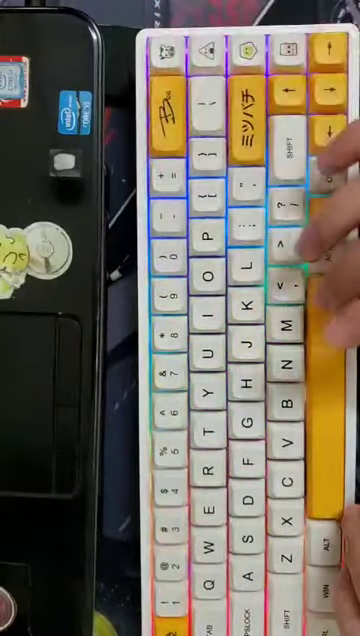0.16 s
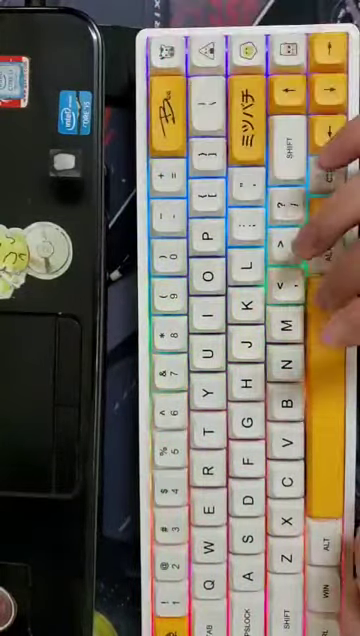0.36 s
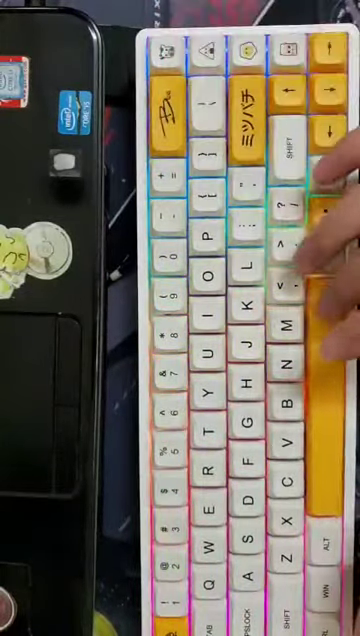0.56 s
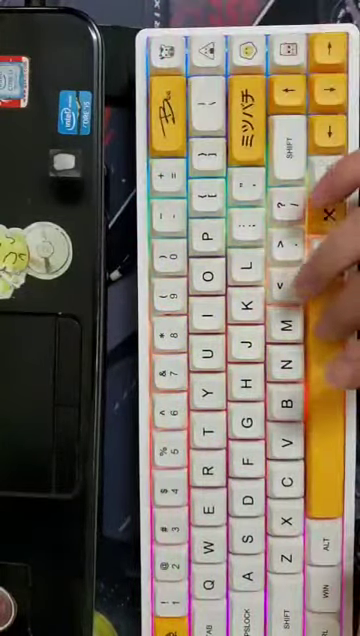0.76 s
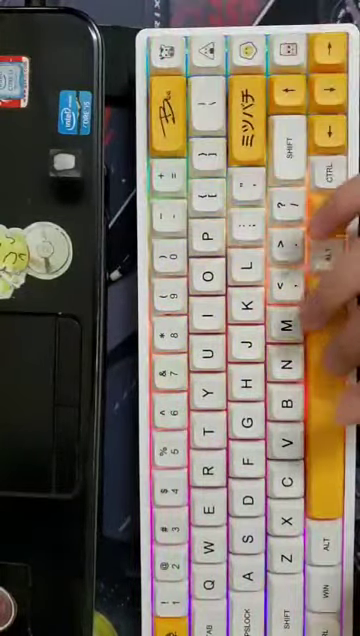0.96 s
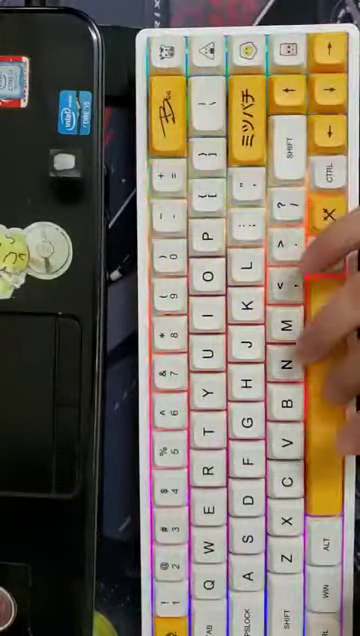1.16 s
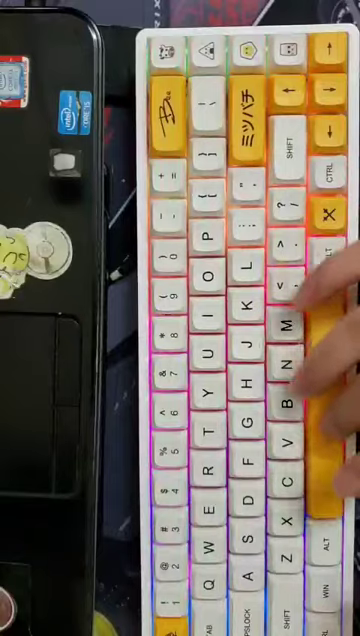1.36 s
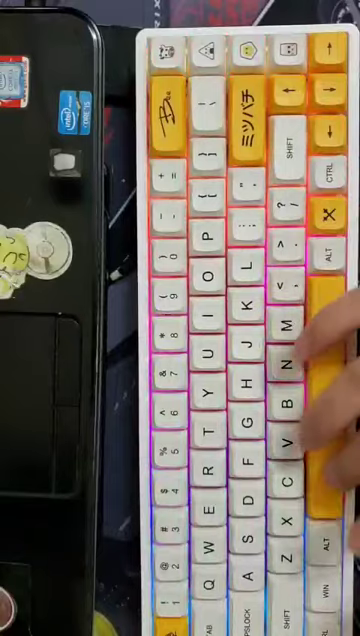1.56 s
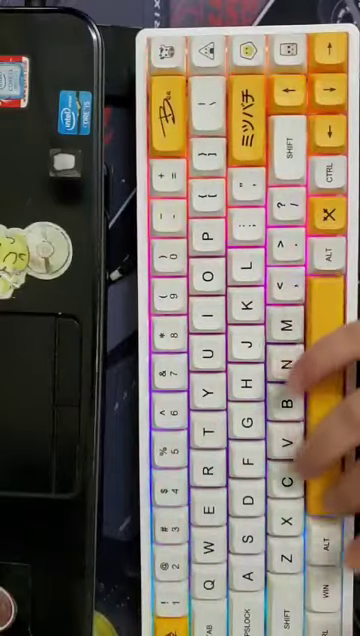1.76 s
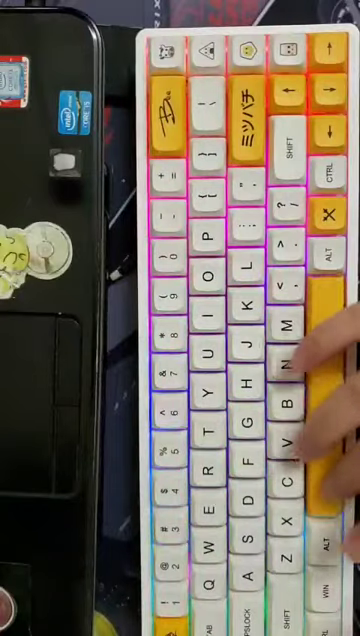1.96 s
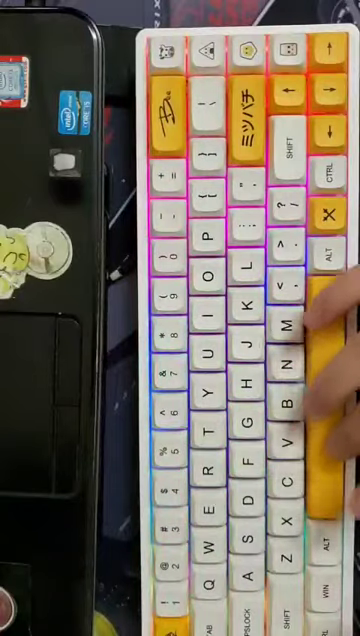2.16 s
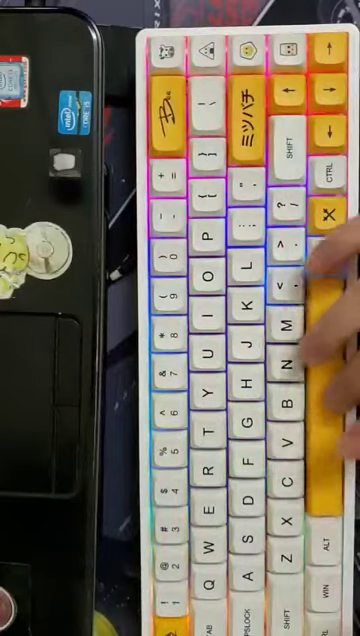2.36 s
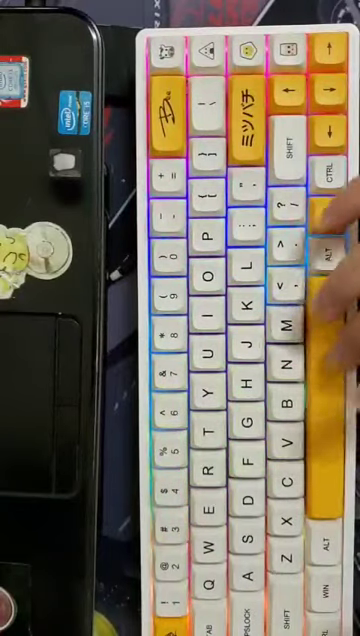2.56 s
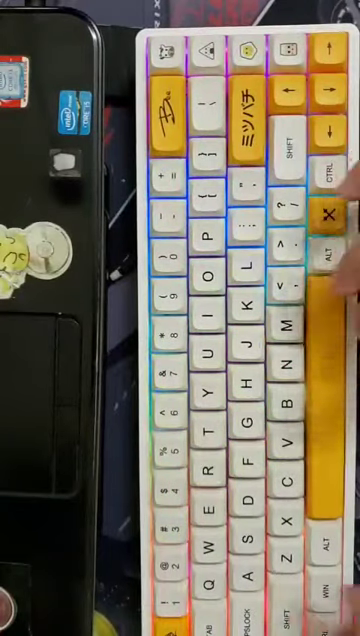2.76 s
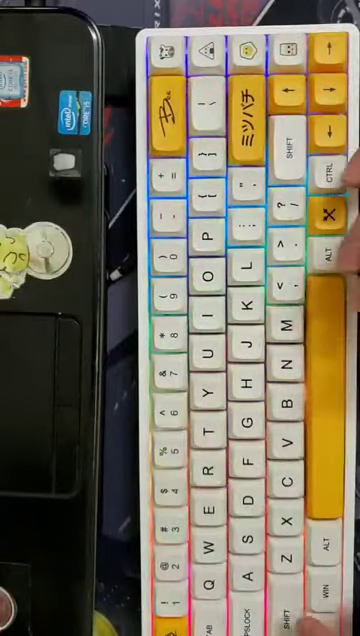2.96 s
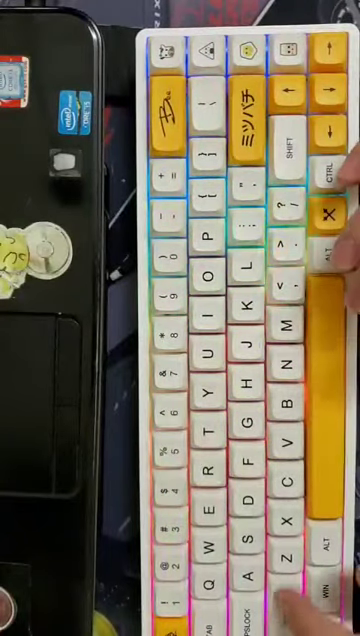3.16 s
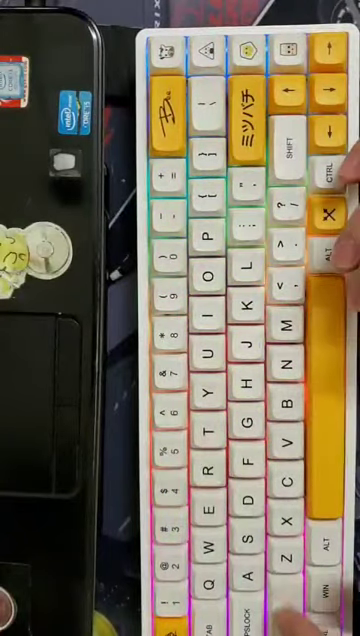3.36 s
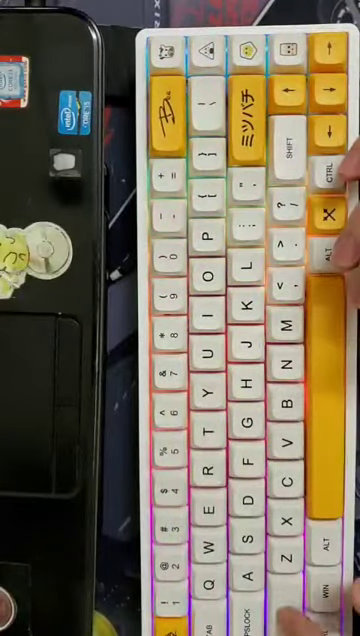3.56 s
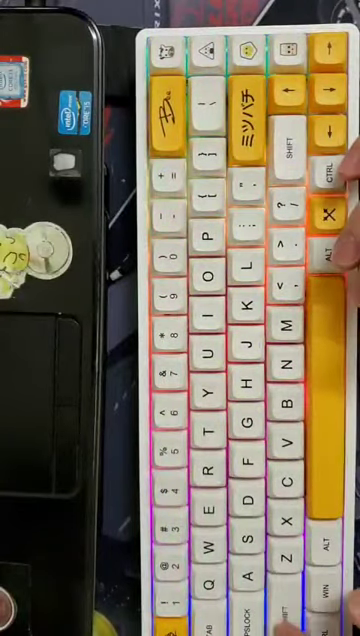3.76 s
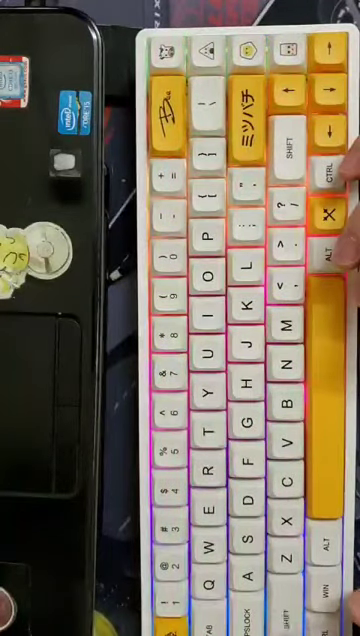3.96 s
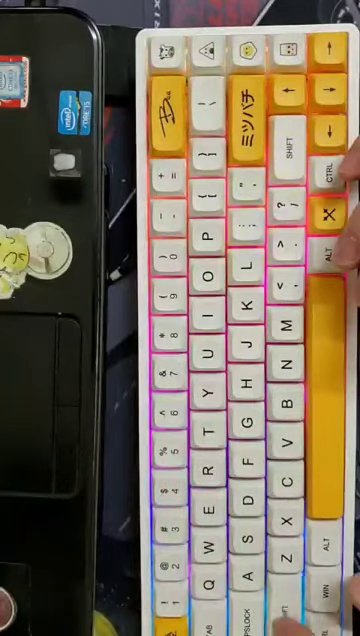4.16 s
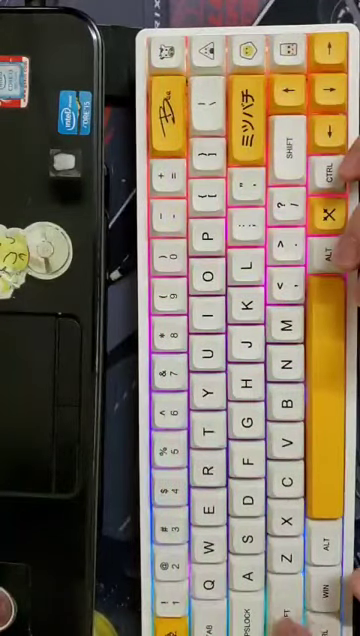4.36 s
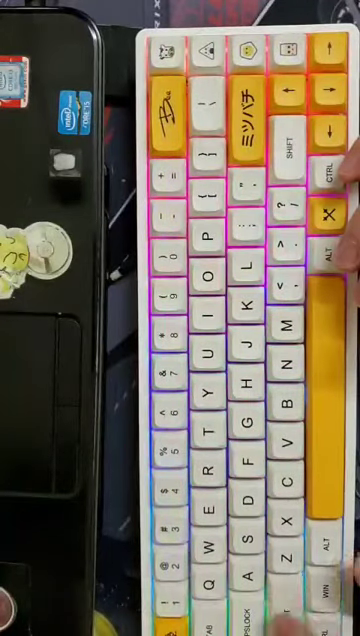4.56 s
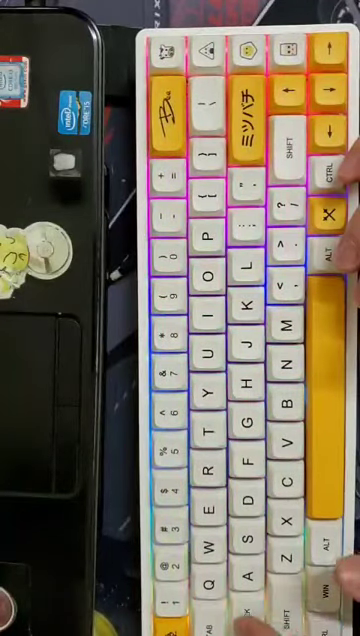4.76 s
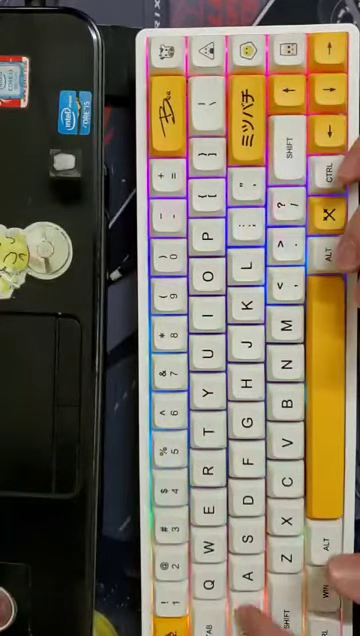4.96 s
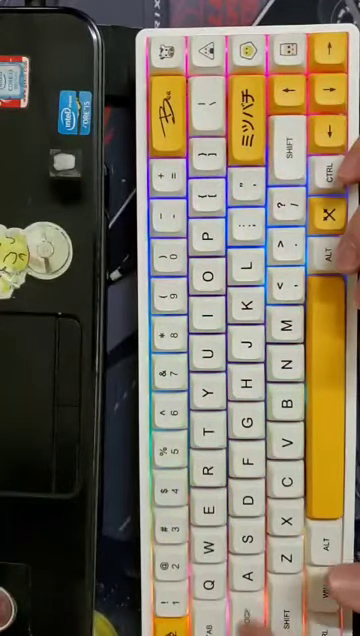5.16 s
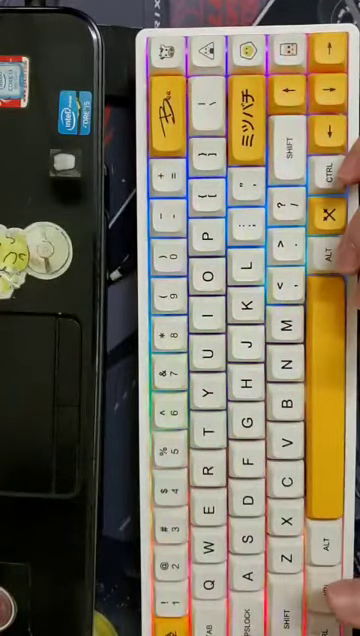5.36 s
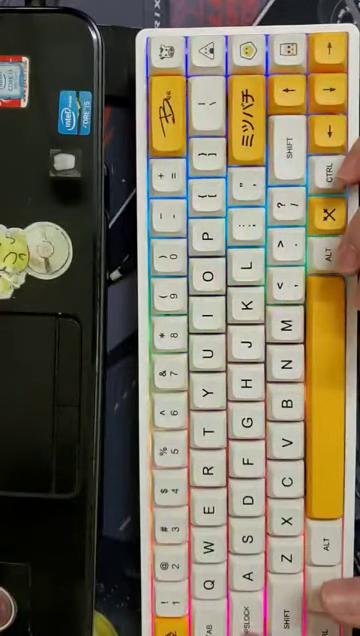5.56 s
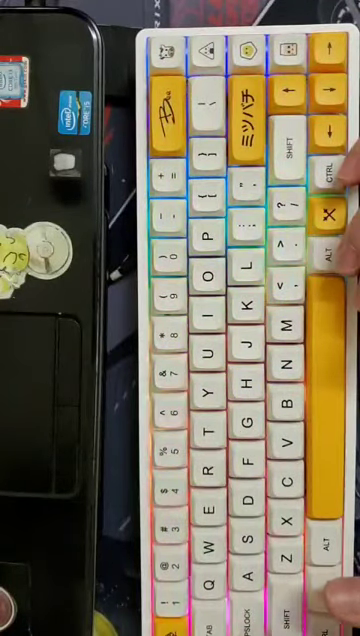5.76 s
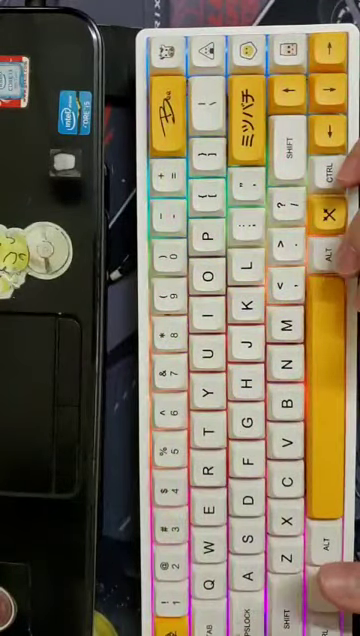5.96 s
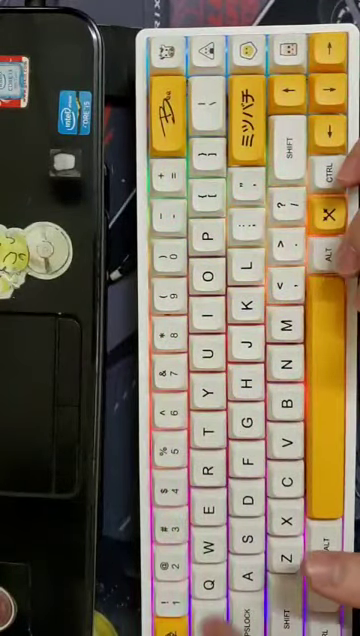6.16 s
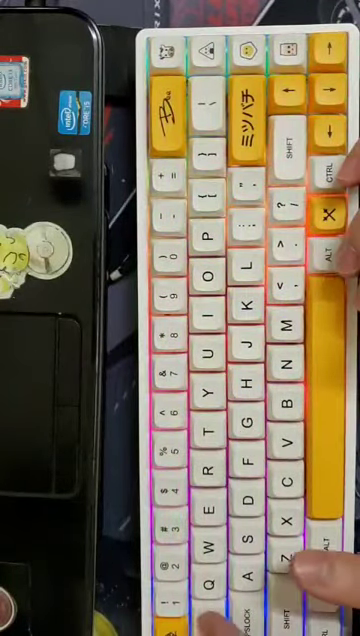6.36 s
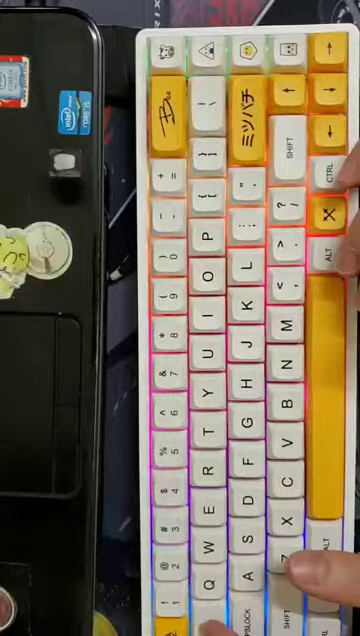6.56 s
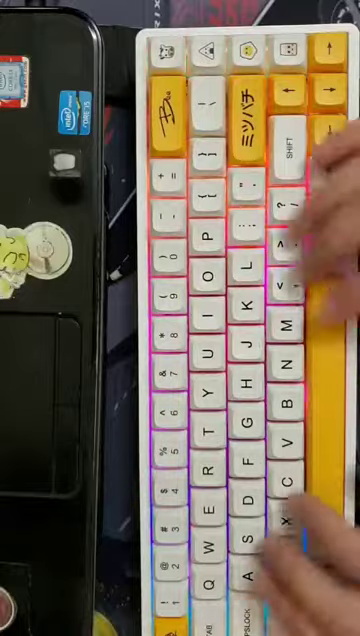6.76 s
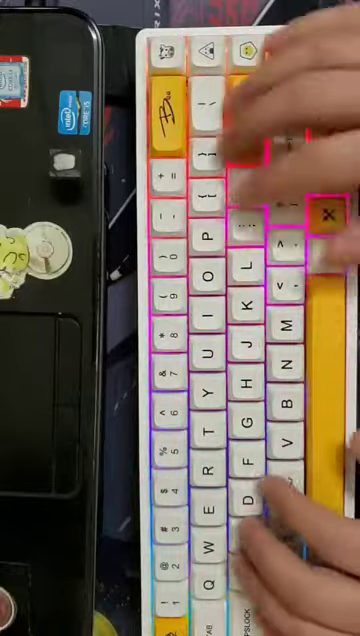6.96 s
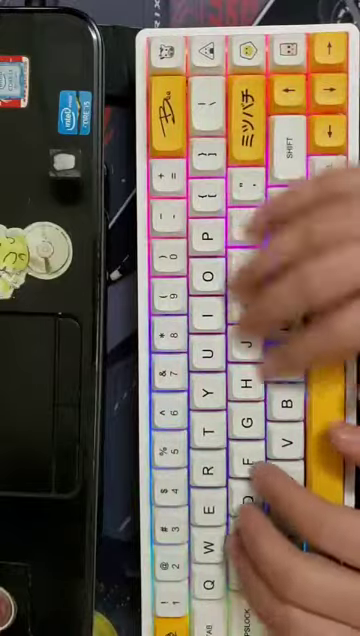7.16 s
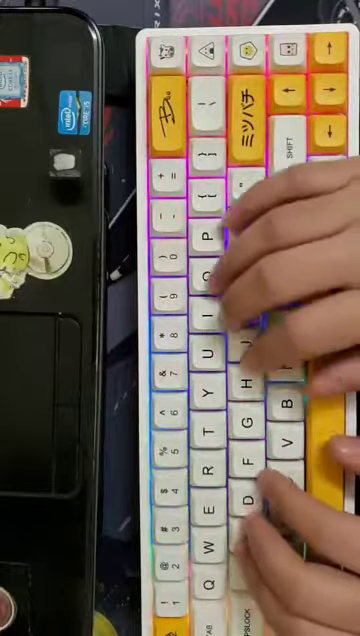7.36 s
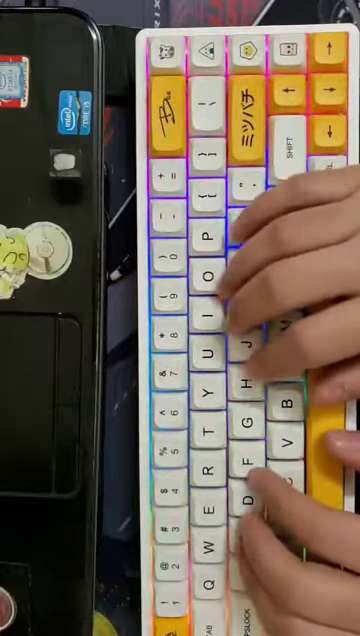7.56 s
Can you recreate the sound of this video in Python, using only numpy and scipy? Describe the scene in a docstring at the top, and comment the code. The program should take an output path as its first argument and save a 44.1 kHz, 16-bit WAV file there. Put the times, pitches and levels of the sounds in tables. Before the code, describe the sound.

Close stereo microphone over a mechanical keyboard in a small quiet room. The space bar is tapped sixteen times at an even pace, deep and hollow with a soft desk thump. Then three wide keys at the left end follow in turn, brighter and drier, each press paired with a lighter release tick. A short rattle follows the last tap, then hands brush the keys softly.

```python
"""In a small room, four wide keys of a mechanical keyboard are tapped in turn close to a stereo microphone:
space bar, shift, caps lock, tab. Damped resonances form the keycap and case; coloured impulses, noise bursts
and decaying sines form the switch tick, spring buzz and desk thump; diffuse echoes answer them.
Shaped noise gives a brief keycap rattle, soft bumps and brushes of the hands, and the quiet room noise."""
import sys
import numpy as np
from scipy import signal
from scipy.fft import rfft, irfft
from scipy.io import wavfile
from scipy.ndimage import uniform_filter1d

SR = 44100
rng = np.random.default_rng(int(sys.argv[2]) if len(sys.argv) > 2 else 0)


def to_wav(sig):
    """Store sig (one row per channel, or 1-D mono) as 16-bit WAV at the path in sys.argv[1].

    Samples outside -1..1 are clipped; the rate is SR.
    """
    pcm = np.clip(np.atleast_2d(sig), -1, 1) * 32767
    pcm = np.round(pcm).astype(np.int16)
    wavfile.write(sys.argv[1], SR, pcm.T)  # frames by channels


N = 335160

# Taps on each key: [press t/s, press level/dB, hold t/s, release level/dB]
SPACE_TAPS = [(0.4427, -28.5, 0.074, -34.5), (0.5957, -24, .074, -33), (0.7633, -24, .0746, -39),
              (0.9097, -25.5, 0.069, -32.5), (1.0718, -24.5, 0.069, -36), (1.2188, -24, 0.064, -35),
              (1.3674, -22, 0.064, -37), (1.5109, -22, .0631, -33.5), (1.6679, -21, .0611, -31),
              (1.816, -20, 0.072, -33.5), (1.9768, -21.5, .0648, -37), (2.1137, -21.5, .0702, -38.5),
              (2.2615, -22, 0.062, -39.5), (2.4021, -24.5, 0.056, -37), (2.5482, -26.5, 0.045, -34.5),
              (2.7057, -34, 0.046, -38.5)]
CAPS_TAPS = [(4.8718, -26.5, .077, -31.5), (5.0419, -30, 0.068, -31.5), (5.1884, -22.5, .0691, -30),
             (5.3436, -26, 0.067, -33.5), (5.4877, -30, .0549, -34), (5.6188, -27.5, .0625, -32.5),
             (5.754, -25.5, 0.061, -29.5), (5.9086, -26, .0826, -33)]
TAB_TAPS = [(6.2756, -35, .074, -32), (6.4383, -34, 0.059, -35), (6.5774, -27, .0806, -35)]
# Taps on shift, whose tick a cushioning finger softens:
# [press t/s, press level/dB, hold t/s, release level/dB, press cushion/dB, release cushion/dB]
SHIFT_TAPS = [(3.1601, -33.5, .0672, -34.5, 6, 2.5), (3.3247, -27.5, 0.069, -35, 1.5, 6),
              (3.4869, -27.5, 0.068, -25, 2.5, 16.5), (3.6385, -25, 0.062, -26.5, 33, 21),
              (3.7861, -27, 0.054, -28, 7, 5), (3.9235, -27, 0.062, -32.5, 7.5, 4),
              (4.0532, -29.5, .0703, -36, 21, 20), (4.2029, -28.5, .0598, -30.5, 11.5, 30),
              (4.3554, -33.5, 0.052, -25, 22, 12.5), (4.4973, -26.5, .0773, -38.5, 5, 15)]
# Keycap resonances: [f/Hz, bandwidth/Hz, relative level/dB]
SPACE_CAP = [(1292, 53, -11), (1640, 110, -3.5), (1753, 170, 3.5), (2240, 490, -9.5), (2574, 125, -4.5),
             (3323, 190, -5), (3910, 180, -7.5)]
SHIFT_CAP = [(1271, 84, 13.5), (1624, 240, 14.5), (1857, 190, 11.5), (2060, 150, 8.5), (2490, 130, -22.5)]
CAPS_CAP = [(1250, 100, 1), (1770, 530, 9.5), (2130, 370, -3), (2545, 110, 5), (3400, 440, -7)]
TAB_CAP = [(1730, 2100, 4), (2260, 390, -9), (2440, 300, 2.5), (3080, 560, -1.5)]
# Case resonances under the middle and at the left end: [f/Hz, bandwidth/Hz, relative level/dB]
CASE_MIDDLE = [(463.4, 103, 1), (501, 88, 3), (565, 33, 1.5), (844, 54, -6.5), (1046, 93, -3.5)]
CASE_END = [(214, 230, 2.5), (441, 48, 6), (896, 163, 11.5), (1057, 24, -7.5)]
# Spectral envelopes of the switch ticks: [f/Hz, relative level/dB]
DULL_TICK = [(1700, -13), (4200, -2.5), (7500, -10.5), (10000, -17.5), (14000, -16.5), (16500, -37.5)]
SHARP_TICK = [(1200, -2.5), (3000, 2.5), (6000, -8), (8000, -6.5), (11000, -11.5), (13000, -14),
              (16500, -15.5)]
SHIFT_TICK = [(1200, -0.5), (3000, 5), (6000, 0), (9000, -5.5), (11500, -5), (13500, -24.5), (16500, -22)]
# Switch spring resonances: [f/Hz, bandwidth/Hz, relative level/dB]
SPACE_SPRING = [(5120, 560, 3.5), (7160, 320, -7)]
SHIFT_SPRING = [(5600, 1200, 0)]
CAPS_SPRING = [(5210, 270, -8.5), (7500, 78, -2.5), (11000, 1900, -24)]
TAB_SPRING = [(6130, 840, 1)]
# Blow levels at normal strength, one row for a press and one for a release:
# [case level/dB, switch tick level/dB, desk level/dB]
SPACE_LEVELS = [(-28.5, -48.5, -30.5), (-28, -52.5, -31.5)]
SHIFT_LEVELS = [(-40, -32.5, -37.5), (-38, -38.5, -43.5)]
CAPS_LEVELS = [(-38.3, -36, -42.5), (-37.4, -42.5, -49)]
TAB_LEVELS = [(-41, -29.5, -38.5), (-38.5, -36, -44)]
# Slow change of the desk thump, added to its level: [t/s, level/dB]
THUMP_LEVEL = [(.45, 1.5), (1.1, 2.5), (1.45, -2.5), (2.2, -2), (2.7, 1), (3.3, -2), (4.1, -4.5),
               (4.9, 0.5), (5.75, -0.5), (5.9, 6), (6.3, 0.5)]
# Desk modes: [f/Hz, t60/s, relative level on a press/dB, relative level on a release/dB]
DESK_MODES = [(63.1, 0.64, -21, -52), (88, 0.12, -1.5, -8.5), (109.1, 0.12, 2, -8), (138.7, 0.3, -6, -3),
              (278.3, 0.12, -14, -11.5)]
# Reverberation time of the room: [f/Hz, t60/s]
ROOM_T60 = [(150, 0.22), (2000, 0.26), (6000, 0.47), (14000, 0.36)]
# Spectral envelope of the room's echoes: [f/Hz, level/dB]
ROOM_COLOUR = [(100, 8), (300, 6.5), (600, -1), (950, 0.5), (1800, -3), (3000, -1.5), (5500, -4),
               (9000, -3.5), (14000, 1.5)]
# Spectral envelope of the room noise: [f/Hz, relative level/dB]
AIR_COLOUR = [(30, -48), (55, 3.5), (80, -14.5), (115, -6.5), (190, -25), (265, -13.5), (380, -21),
              (600, -14.5), (930, -27.5), (1500, -22), (2600, -35.5), (5000, -45.5), (10500, -53),
              (15000, -43)]
# Soft bumps and brushes of the hands: [t/s, rise/s, t60/s, level/dB]
BUMPS = [(3.765, 0.014, 0.19, -49.5), (6.779, 0.0056, 0.083, -44.5), (6.815, 0.0092, 0.11, -49)]
BRUSHES = [(0.02, 0.045, 0.37, -60.5), (7.16, 0.05, 0.1, -55), (7.2, 0.019, 0.27, -48.5),
           (7.221, .005, 0.078, -72)]
# Spectral envelopes of bump and brush: [f/Hz, relative level/dB]
BUMP_COLOUR = [(150, -40), (270, -3), (340, -12.5), (500, -24), (4000, -53)]
BRUSH_COLOUR = [(200, -11), (500, 1), (1400, 5.5), (2500, -4), (5000, -20), (9000, -18), (14500, -11.5),
                (16000, -17)]
# Rattle of a keycap shaken loose by a hard press: [t/s, rise/s, t60/s, level/dB]
RATTLES = [(6.583, 0.0021, 0.16, -35)]
# Spectral envelope of the rattle: [f/Hz, relative level/dB]
RATTLE_COLOUR = [(1300, -26.5), (2950, 5.5), (7500, -47)]

# Samples in one stroke's sound, in its lead-in and in 10 ms
SIZE, LEAD, FRAME = 16384, 256, 441
HZ = np.fft.rfftfreq(SIZE, 1 / SR)
T = np.arange(SIZE) / SR
LOW_HZ, TOP_HZ = 47, 16300  # edges of the microphone's band
NORMAL_DB = -30  # strength of a normal stroke
# Growth in dB per dB of strength; the keycap grows by 1
CASE_GROWTH, TICK_GROWTH, DESK_GROWTH = 0.58, 1.375, 0.5
TOUCH_CASE_DB = -55.5  # a fingertip landing on a key faintly knocks the case
SLIDE_T60_S = 0.06
LATE_DB, LATE_T60_S = -15.5, 0.47  # the room's faint late tail
LATE_BAND_HZ = 1200, 2300  # the range in which it lingers


def amp(db):
    """Decibel law: an amplitude ratio of ten for every 20 dB."""
    return 10 ** (np.asarray(db) / 20)


def along(points, hz):
    """Linear interpolation of tabulated values over logarithmic frequency."""
    f, v = np.transpose(points)
    return np.interp(np.log(hz + 1), np.log(f), v)


def noise(colour, alike):
    """Partial coherence: two coloured noises mixed to channels of rms near 1 and correlation `alike`."""
    gain = amp(along(colour, np.fft.rfftfreq(N, 1 / SR)))
    common, opposed = irfft(rfft(rng.standard_normal((2, N))) * gain, N)
    turn = np.arccos(alike) / 2
    stereo = np.cos(turn) * common + np.sin(turn) * np.array([opposed, -opposed])
    return stereo / common.std()


def air():
    """Stationary background: quiet room noise, nearly alike on both sides."""
    return amp(-57.0) * noise(AIR_COLOUR, alike=0.85)


def touches(rows, colour, alike):
    """Contact noise: each touch swells as a Gaussian and decays exponentially."""
    t = np.arange(N) / SR
    level = np.zeros(N)
    for s, rise, t60, db in rows:
        swell = np.exp(-(np.minimum(t - s, 0) / rise) ** 2)
        decay = amp(db - 60 * np.maximum(t - s, 0) / t60)
        level += decay * swell
    return level * noise(colour, alike)


def hands():
    """Stick-slip friction: fingers catch and slip over the keycaps; a palm bumps the desk."""
    grain = uniform_filter1d(rng.standard_normal(N), size=160)
    catches = amp(3 * grain / grain.std())
    bumps = touches(BUMPS, BUMP_COLOUR, alike=0.87)
    return bumps + catches * touches(BRUSHES, BRUSH_COLOUR, alike=0.14)


def rattle():
    """Loose contact: a brief noise burst from the keycap after the hardest tab press."""
    return touches(RATTLES, RATTLE_COLOUR, alike=0.3)


def delay(ms):
    """Shift theorem: a delay is a phase proportional to frequency."""
    return np.exp(-2j * np.pi * HZ * ms / 1000)


def band(low_hz, high_hz):
    """Limited radiation: a small part radiates little outside its range (causal band-pass)."""
    b, a = signal.butter(2, [low_hz, high_hz], "bandpass", fs=SR)
    return signal.freqz(b, a, HZ, fs=SR)[1]


def chatter(t60):
    """Random impacts: many tiny contacts dying away, scaled to unit energy on the left."""
    burst = rng.standard_normal((2, SIZE)) * amp(-60 * T / t60)
    return rfft(burst) / np.linalg.norm(burst[0])


def walls(first_s, t60):
    """Early reflection: a cluster of echoes from the nearest walls."""
    return chatter(t60) * delay(1000 * first_s)


def room(early, tail_db, first_s, mono_hz, bass_spread):
    """Reverberation: early echoes, a short diffuse tail and a faint late one; the bass is nearly alike."""
    hz, t, z = signal.stft(rng.standard_normal((2, SIZE)), SR, nperseg=256)
    decay = amp(-60 * t / along(ROOM_T60, hz)[:, None])
    tail = signal.istft(z * decay, SR, nperseg=256)[1][:, :SIZE]
    tail = tail * (T > first_s)
    diffuse = amp(tail_db) * rfft(tail) / np.linalg.norm(tail[0])
    late = amp(LATE_DB) * chatter(LATE_T60_S) * band(*LATE_BAND_HZ)
    mid, side = early + diffuse + late
    # the side part shrinks to bass_spread below mono_hz
    spread = np.hypot(HZ, bass_spread * mono_hz) / np.hypot(HZ, mono_hz)
    stereo = (mid + spread * np.array([side, -side])) / np.sqrt(1 + spread ** 2)
    return amp(along(ROOM_COLOUR, HZ)) * stereo


def near_echo(gain, ms, dull_hz):
    """Single reflection: a hard surface close by returns the sound once, duller above dull_hz."""
    return 1 + gain * delay(ms) / (1 + 1j * HZ / dull_hz)


def place(lag_ms, pan_db, apart_hz=1550):
    """Stereo difference: positive pan favours the left, positive lag lets it lead; long waves stay in step."""
    lag = lag_ms * HZ ** 4 / (HZ ** 4 + apart_hz ** 4)
    left = amp(pan_db / 2) * delay(-lag / 2)
    right = amp(-pan_db / 2) * delay(lag / 2)
    return np.array([left, right])


def blow(spectrum):
    """Energy normalization: a short sound is given the energy of 10 ms at rms 1."""
    energy = np.mean(np.sum(irfft(spectrum) ** 2, -1))
    return spectrum / np.sqrt(energy / FRAME)


def desk(released, tilt_db, rise_s, late_ms, scatter_db):
    """Modal vibration: the desk top swings up slowly and booms on; tilt in dB per octave acts below 150 Hz."""
    hz, t60, down, up = np.transpose(DESK_MODES)[:, :, None]
    tilt = tilt_db * np.minimum(np.log2(hz / 150), 0)
    db = (up if released else down) + tilt + scatter_db * rng.standard_normal(hz.shape)
    boom = np.sum(amp(db - 60 * T / t60) * np.sin(2 * np.pi * hz * T), 0)
    swing_up = 1 - np.exp(-T / rise_s)
    return blow(rfft(boom * swing_up)) * delay(late_ms)


def causal(db):
    """Minimum phase: the folded cepstrum gives the shortest causal response with this gain curve."""
    cepstrum = irfft(np.log(amp(db)))
    cepstrum[1:SIZE // 2] *= 2
    cepstrum[SIZE // 2 + 1:] = 0
    return np.exp(rfft(cepstrum))


def tick(colour, top_hz, rattle_db, rattle_t60):
    """Impact: the stem hits its stop and chatters for milliseconds; a softer stop has a lower top."""
    top_loss_db = 10 * np.log10(1 + (HZ / top_hz) ** 20)
    contact = causal(along(colour, HZ) - top_loss_db)
    return contact * (1 + amp(rattle_db) * chatter(rattle_t60))


def ring(modes, scatter_db, detune, apart_db):
    """Damped resonance: modes vary in pitch and level as the finger lands a little differently each time."""
    hz, width, db = np.transpose(modes)[:, :, None]
    hz = hz * (1 + detune * rng.standard_normal(hz.shape))
    db = db + scatter_db * rng.standard_normal(hz.shape)
    gain = amp(db + apart_db * rng.standard_normal((2,) + hz.shape))  # separate on each side
    resonance = 1j * HZ * width / (hz ** 2 - HZ ** 2 + 1j * HZ * width)
    return np.sum(gain * resonance, 1)


def add(track, s, spectrum):
    """Superposition: a short sound, with its lead-in, is summed into the track at time s."""
    sound = np.roll(irfft(spectrum), LEAD)
    start = round(s * SR) - LEAD
    track[:, start:start + SIZE] += sound[:, :N - start]


def strokes(taps, levels):
    """Excitation: one strength per press or release sets how hard keycap, case, switch and desk sound."""
    growth = np.array([CASE_GROWTH, TICK_GROWTH, DESK_GROWTH])
    for s, press_db, hold_s, release_db, *cushions in taps:
        pair = zip((s, s + hold_s), (press_db, release_db), cushions or (0, 0))
        for released, (at, db, cushion_db) in enumerate(pair):
            case_db, tick_db, desk_db = levels[released] + (db - NORMAL_DB) * growth
            desk_db = desk_db + np.interp(at, *np.transpose(THUMP_LEVEL))
            yield at, released, db, case_db, tick_db - cushion_db, desk_db


def key(blows, cap_modes, case_modes, colour, springs, lag_ms, pan_db, tick_pan_db, top_hz,
        desk_tilt_db, case_ms, case_low_hz, echo, press_rattle_db, release_rattle_db,
        press_spring_db, release_spring_db, spring_t60, touch_db, wet_db, tick_wet_db):
    """Impulsive excitation of coupled parts: one key bottoms out and snaps back, again and again."""
    track = np.zeros((2, N))
    bounce = near_echo(gain=echo, ms=2.332, dull_hz=3930)
    cap_path = band(low_hz=1117, high_hz=2970) * bounce * place(lag_ms, pan_db)
    case_path = band(low_hz=case_low_hz, high_hz=1450) * bounce * delay(case_ms)
    steady_echoes = walls(first_s=0.008, t60=0.041)
    for s, released, cap_db, case_db, tick_db, desk_db in blows:
        rattle_db = release_rattle_db if released else press_rattle_db
        spring_db = release_spring_db if released else press_spring_db

        # the cap wobbles on its stem, so every blow is a little rough
        wobble = 1 + amp(-7.5) * chatter(t60=0.024)
        cap = ring(cap_modes, scatter_db=1.5, detune=0.019, apart_db=-1)
        cap = amp(cap_db) * blow(cap * cap_path * wobble)
        case = ring(case_modes, scatter_db=3.0, detune=0.01, apart_db=2.5)
        case = amp(case_db) * blow(case * case_path)
        clack = cap + case

        click = tick(colour, top_hz, rattle_db, rattle_t60=0.0089)
        click = amp(tick_db) * blow(click * place(lag_ms, tick_pan_db)) * delay(0.23)

        # the loose spring goes on buzzing after the blow
        buzz = ring(springs, scatter_db=-3.5, detune=0.0025, apart_db=-1.0)
        buzz = amp(tick_db + spring_db) * blow(buzz * chatter(spring_t60))

        if not released:
            # the fingertip meets the cap and the stem slides just before the key bottoms out
            slide = ring(cap_modes, scatter_db=5, detune=0.065, apart_db=9.5)
            slide = blow(slide * cap_path * chatter(SLIDE_T60_S))
            nudge = ring(case_modes, scatter_db=0.5, detune=0.02, apart_db=9)
            nudge = blow(nudge * case_path * chatter(t60=0.036))
            landing = amp(NORMAL_DB + touch_db) * slide + amp(TOUCH_CASE_DB) * nudge
            add(track, s - rng.uniform(0.011, 0.021), landing)

        thump = desk(released, desk_tilt_db, rise_s=0.0061, late_ms=6.94, scatter_db=2.5)
        thump = amp(desk_db) * thump

        # the echo pattern stays with the key, in part changed by the moving hand
        early = (steady_echoes + walls(first_s=0.008, t60=0.041)) / np.sqrt(2)
        answer = room(early, tail_db=2.0, first_s=0.0091, mono_hz=1390, bass_spread=0.28)
        direct = clack + click + buzz + thump
        sent = clack + amp(-0.5) * buzz + amp(tick_wet_db) * click + amp(-5.5) * thump
        add(track, s, direct + sent * amp(wet_db) * answer)
    return track


def keyboard():
    """Resonance and position: a deep space bar in the middle, three brighter keys at the left end."""
    space = key(
        strokes(SPACE_TAPS, SPACE_LEVELS), SPACE_CAP, CASE_MIDDLE, DULL_TICK, SPACE_SPRING,
        lag_ms=0.064, pan_db=0.5, tick_pan_db=-0.1, top_hz=15200,
        desk_tilt_db=-1.0, case_ms=0.66, case_low_hz=297, echo=0.078,
        press_rattle_db=8.0, release_rattle_db=2, press_spring_db=-7.5, release_spring_db=-4.5,
        spring_t60=0.19, touch_db=-20.5, wet_db=-12.0, tick_wet_db=0.5)
    shift = key(
        strokes(SHIFT_TAPS, SHIFT_LEVELS), SHIFT_CAP, CASE_END, SHIFT_TICK, SHIFT_SPRING,
        lag_ms=-0.13, pan_db=0.5, tick_pan_db=14, top_hz=12800,
        desk_tilt_db=12.5, case_ms=0.5, case_low_hz=287, echo=0.26,
        press_rattle_db=-17, release_rattle_db=15, press_spring_db=-24, release_spring_db=-13.5,
        spring_t60=0.15, touch_db=-21, wet_db=-11.5, tick_wet_db=-20)
    caps = key(
        strokes(CAPS_TAPS, CAPS_LEVELS), CAPS_CAP, CASE_END, SHARP_TICK, CAPS_SPRING,
        lag_ms=-0.15, pan_db=2.0, tick_pan_db=1.5, top_hz=15000,
        desk_tilt_db=-2.0, case_ms=0.53, case_low_hz=574, echo=0.37,
        press_rattle_db=3.0, release_rattle_db=1, press_spring_db=-37.5, release_spring_db=4.0,
        spring_t60=0.018, touch_db=-19.5, wet_db=-10.5, tick_wet_db=-7.5)
    tab = key(
        strokes(TAB_TAPS, TAB_LEVELS), TAB_CAP, CASE_END, SHARP_TICK, TAB_SPRING,
        lag_ms=-0.17, pan_db=2.5, tick_pan_db=7, top_hz=14400,
        desk_tilt_db=-15, case_ms=0.093, case_low_hz=328, echo=0.57,
        press_rattle_db=5.5, release_rattle_db=17, press_spring_db=-37, release_spring_db=-2.5,
        spring_t60=0.029, touch_db=-22, wet_db=-10.0, tick_wet_db=-10.0)
    return space + shift + caps + tab


def scene():
    """Linear superposition of room noise, hands, rattle and keys."""
    return air() + hands() + rattle() + keyboard()


def record(dry):
    """Band limitation: the microphone drops the deepest bass and keeps nothing from TOP_HZ upward."""
    bass_cut = signal.butter(6, LOW_HZ, "highpass", fs=SR, output="sos")
    lean = signal.sosfilt(bass_cut, dry)
    return irfft(rfft(lean) * (np.fft.rfftfreq(N, 1 / SR) < TOP_HZ), N)


dry = scene()
out = record(dry)
to_wav(out)
```